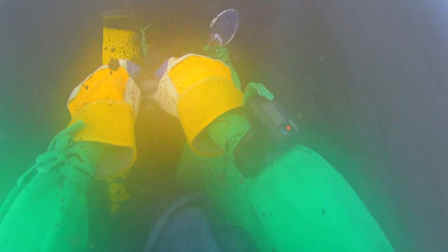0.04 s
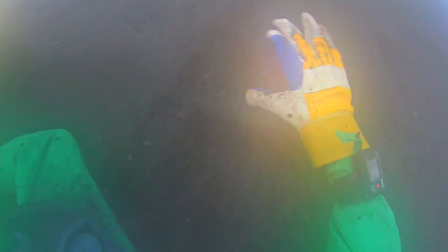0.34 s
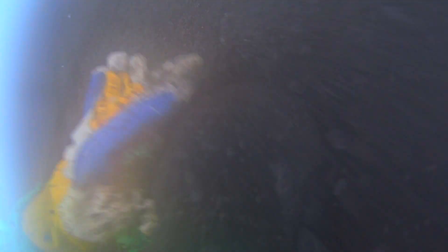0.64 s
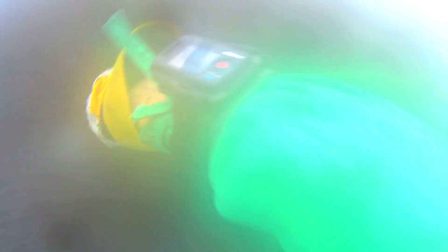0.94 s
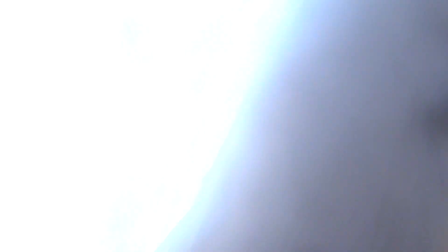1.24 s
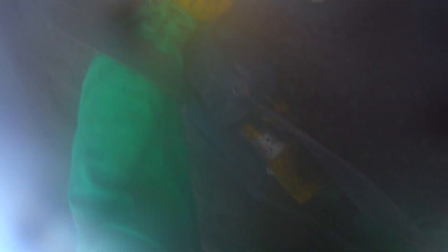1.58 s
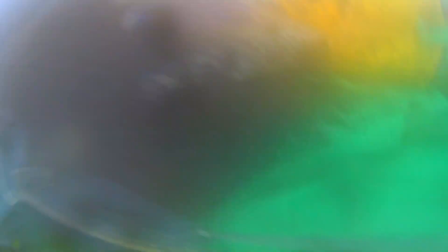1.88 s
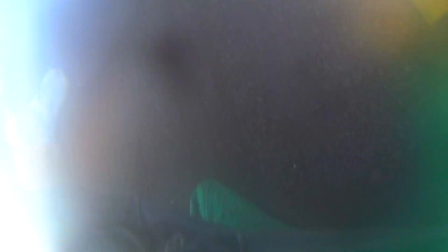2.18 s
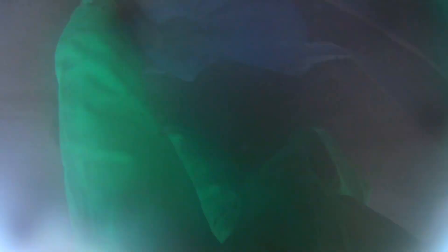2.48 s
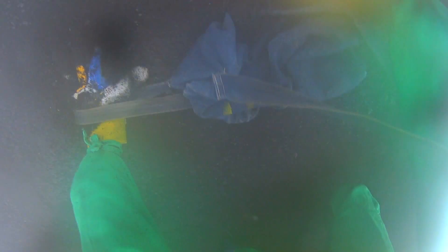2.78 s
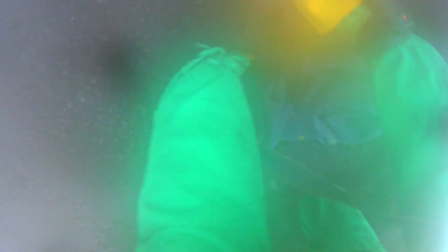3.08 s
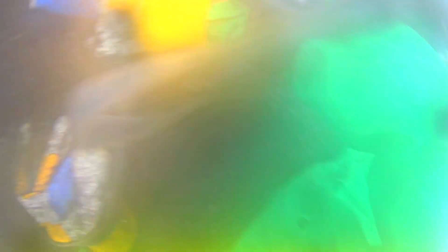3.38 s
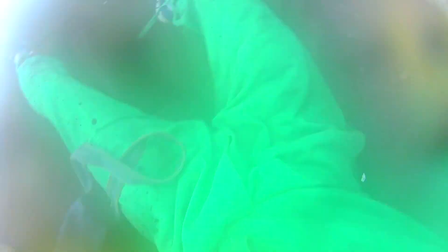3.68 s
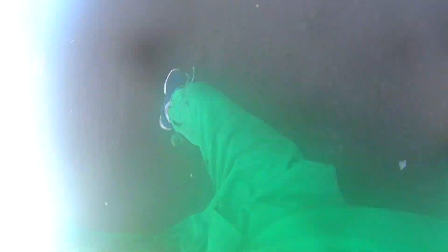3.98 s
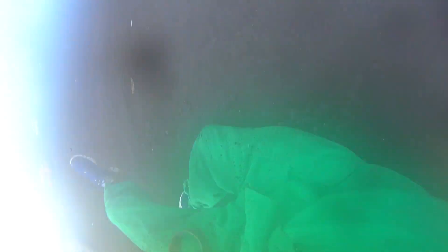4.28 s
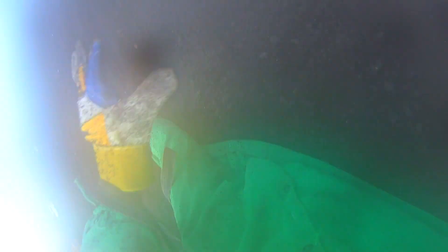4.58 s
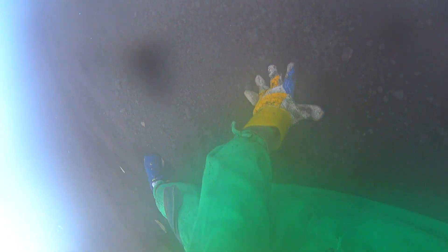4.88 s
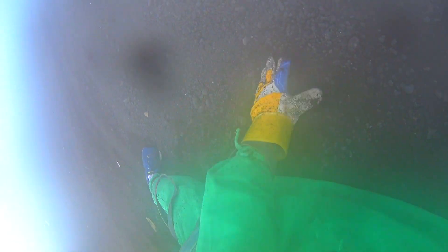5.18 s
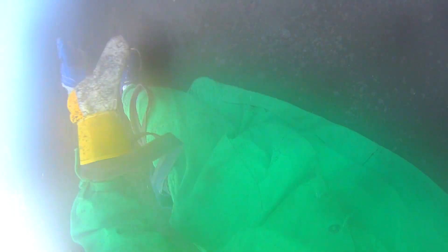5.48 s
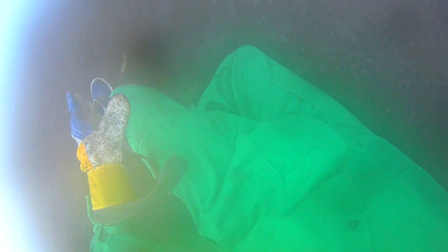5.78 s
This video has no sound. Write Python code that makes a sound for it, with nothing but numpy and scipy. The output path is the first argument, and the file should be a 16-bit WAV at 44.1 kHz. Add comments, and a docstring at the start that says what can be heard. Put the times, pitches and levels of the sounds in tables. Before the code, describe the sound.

Heard from a helmet microphone on an open slope, coarse gravel rattles and rumbles under a falling rider. A loud scrape and a spray of sand come early, followed by a run of hard plastic knocks, sharp ticks of stones and dull body thuds, with a faint metallic tone ringing on. In the second half the knocks thin out and the grinding fades, leaving short scrapes and a fine sandy hiss.

```python
"""A slope of volcanic gravel, heard from a helmet camera as its rider comes off a board and tumbles.
Gravel grinds on the helmet, the camera knocks in its plastic case and grit snaps against it;
all of this rings in the case. The body thumps on the ground, a few blows leave a thin metallic ring,
and fine sand hisses on as the slide dies away."""
import sys
import numpy as np
from scipy import signal
from scipy.fft import rfft, irfft
from scipy.io import wavfile
from scipy.ndimage import uniform_filter1d, minimum_filter1d

SR = 44100
rng = np.random.default_rng(int(sys.argv[2]) if len(sys.argv) > 2 else 0)


def int16_out(signal):
    """Quantize to a 16-bit WAV file."""
    q = np.round(np.clip(np.atleast_2d(signal).T, -1, 1) * 32767)
    wavfile.write(sys.argv[1], SR, q.astype(np.int16))


N = 257544
TIME = np.arange(N) / SR

# how hard the gravel grinds under the rider: time_s, level_db
GRIND_LEVEL = [(0, -27.5), (0.17, -36), (0.55, -29), (0.78, -21.5), (0.92, -31.5), (1.17, -29), (1.55, -37),
               (1.98, -30.5), (2.2, -38), (2.6, -39.5), (2.92, -43.5), (3.12, -37), (3.3, -42),
               (4.12, -39.5), (4.36, -61), (4.62, -44), (5.0, -47), (5.3, -58.5), (5.6, -52)]
# how much sand streams past the helmet: time_s, level_db
SAND_LEVEL = [(0, -47.5), (0.55, -44.5), (0.7, -30.5), (0.85, -31), (0.96, -46.5), (1.08, -34),
              (1.3, -57.5), (1.66, -43.5), (1.95, -42.5), (2.36, -55.5), (2.55, -45), (3.44, -38.5),
              (3.5, -57), (4.08, -44), (4.3, -47), (4.7, -40), (5.2, -47.5), (5.84, -54)]
# the helmet drags over the ground: start_s, end_s, level_db
DRAGS = [(0.452, 0.512, -28.5), (0.62, 0.733, -33), (0.746, 0.844, -16), (0.97, 1.002, -25.5),
         (1.03, 1.106, -29.5), (1.23, 1.238, -20.5), (1.411, 1.492, -29.5), (1.663, 1.738, -32),
         (1.958, 1.973, -20.5), (2.27, 2.288, -19.5), (2.489, 2.513, -25), (2.547, 2.606, -32.5),
         (2.688, 2.781, -37.5), (3.001, 3.038, -32.5), (3.075, 3.116, -37), (3.389, 3.414, -28.5),
         (3.461, 3.483, -22), (3.547, 3.56, -29.5), (3.678, 3.82, -38), (3.874, 3.898, -21),
         (3.939, 3.968, -19.5), (4.004, 4.055, -24), (4.083, 4.167, -31), (4.264, 4.284, -26.5),
         (4.486, 4.538, -30), (4.701, 4.714, -33.5), (5.063, 5.096, -27.5), (5.376, 5.417, -48.5),
         (5.823, 5.85, -37)]
# the rider hits the slope: start_s, level_db, pitch_hz
LANDINGS = [(0.448, -36.5, 199), (0.51, -34.5, 130), (0.57, -31, 294), (0.973, -34, 260),
            (1.03, -35.5, 117), (1.189, -26.5, 237), (1.269, -36.5, 245), (1.387, -27, 195.7),
            (1.575, -34, 203), (1.954, -27, 189), (2.278, -33, 261), (2.488, -33, 182), (2.786, -44.5, 185),
            (3.026, -27, 187), (3.384, -36.5, 183), (3.469, -28.5, 182), (3.87, -38, 209),
            (4.264, -44.5, 108), (4.534, -39.5, 260), (4.666, -44.5, 112), (4.986, -47, 207)]


def camera_knocks(bounce_s=0.0065, bounce_db=-7.5, rattles_per_s=7, bumps_per_s=9.2):
    """The camera clacks in its case, a short ring over a dull body; lighter hits ride the grinding."""
    # hard knocks, each followed by one bounce: start_s, ring_db, body_db
    hard_knocks = [(0.0167, -15.5, -42), (0.0935, -19, -46), (0.105, -13.5, -50), (0.1346, -17.5, -30.5),
                   (0.2092, -13, -39.5), (0.2613, -20.5, -40), (0.4463, -14, -30), (0.4661, -14, -46),
                   (0.4789, -11, -29), (0.6032, -14.5, -29.5), (0.6883, -15.5, -55), (0.9767, -12.5, -26),
                   (1.047, -15, -27.5), (1.189, -11.5, -27.5), (1.227, -12.5, -36), (1.3443, -19, -39),
                   (1.3878, -11.5, -20), (1.421, -11, -44), (1.5804, -23, -50), (1.5998, -14.5, -46),
                   (1.7199, -13, -29), (1.788, -18.5, -39.5), (1.9575, -12.5, -34), (1.9836, -15.5, -28.5),
                   (2.0175, -16, -34), (2.0755, -17.5, -59), (2.139, -23, -62), (2.1618, -28, -29),
                   (2.276, -9.5, -23), (2.314, -25.5, -29.5), (2.505, -17, -26.5), (2.8458, -23.5, -46),
                   (3.0018, -21.5, -49), (3.0284, -17, -25.5), (3.186, -19, -39.5), (3.474, -14.5, -27),
                   (3.5094, -12.5, -31), (3.8161, -22, -46), (4.011, -9.5, -50), (4.2719, -18, -38),
                   (5.013, -40, -44)]
    # colour of the ringing clack: freq_hz, gain_db
    clack_tone = [(400, -50), (800, -17), (1150, -2), (1500, 6.5), (2000, -1), (2700, -8), (3600, -16.5),
                  (4300, -11.5), (5000, -8), (8000, -55)]
    # colour of the dull body: freq_hz, gain_db
    body_tone = [(60, -22), (170, -0.5), (300, -2), (550, -2.5), (900, -3.5), (1600, -11.5), (5000, -46)]
    grind_db, = in_time(GRIND_LEVEL)
    hard = np.transpose(hard_knocks)
    bounces = [hard[0] + bounce_s * rng.uniform(0.496, 1.5, len(hard_knocks)), *(hard[1:] + bounce_db)]
    rattle_s, rattle_db = chance_hits(np.full(N, rattles_per_s), grind_db + 8.5)
    rattles = [rattle_s, rattle_db, rattle_db - 22]   # the camera rattles: nearly all ring
    bump_s, bump_db = chance_hits(np.full(N, bumps_per_s), grind_db - 6.5)
    bumps = [bump_s, bump_db - 2, bump_db]   # stones roll under the helmet: soft and hollow
    start_s, ring_db, body_db = np.hstack([hard, bounces, rattles, bumps])
    clack = blows(start_s, ring_db - 1.5, clack_tone, chatter_s=0.0042, chatter=0.88)
    thud = blows(start_s, body_db + 4, body_tone, chatter_s=0.0027, chatter=0.27)
    return through_shell(clack + thud)


def helmet_scrapes(rise_s=0.0057, fall_s=0.0052, slip_db=2.5, trim_db=3, margin=2500):
    """While the helmet drags, stones catch and slip under it in quick uneven bursts."""
    # colour of the rasp: freq_hz, gain_db
    rasp_tone = [(130, -19), (300, -15), (560, -13.5), (750, -3.5), (1000, -3), (1450, 2.5), (2000, -3.5),
                 (2450, -7.5), (3000, -16.5), (3600, -12.5), (4250, -14.5), (4700, -21), (6500, -46)]
    pressure = np.zeros(N)
    for start, end, db in DRAGS:
        near = slice(max(int(start * SR) - margin, 0), int(end * SR) + margin)
        fade = np.maximum(start - TIME[near], 0) / rise_s + np.maximum(TIME[near] - end, 0) / fall_s
        pressure[near] = np.maximum(pressure[near], from_db(db) * np.exp(-fade))
    force = grains(per_s=1300, spread_db=1.5, friction=0.69) * from_db(slip_db * drift(per_s=200))
    rasp = through_shell(through_case(force, rasp_tone))
    power = uniform_filter1d(np.mean(rasp ** 2, axis=0), size=900)
    return from_db(trim_db) * pressure * rasp / np.sqrt(np.abs(power) + 1e-9)


def gravel_slide(crunch_db=2.5, shudder_db=5.1, surge_above_db=-37.5):
    """Gravel rolls under the rider and sprays past; the coarser it is, the more it comes in clumps."""
    # coarseness of the gravel, as the spread of grain sizes: time_s, spread_db
    coarseness = [(0, 6), (.75, 3.5), (1.0, 3.5), (2.3, 7), (2.7, 0.53), (4.8, 0.93), (5.8, 2)]
    # midrange crunch of rolling gravel: freq_hz, gain_db
    grind_tone = [(300, -33), (560, -31), (750, -6.5), (1100, -9.5), (1450, 2), (1950, -4.5), (2600, -9),
                  (3200, -15), (4200, -11), (4900, -20), (6500, -31)]
    # low rumble of the slide: freq_hz, gain_db
    rumble_tone = [(20, -17), (55, -3), (115, 3), (148, -6), (190, 0), (330, -7), (600, -4.5), (1200, -7.5)]
    # bright coarse spray: freq_hz, gain_db
    spray_tone = [(2000, -31), (3600, -12), (5000, 3.5), (6800, 3.5), (7800, 5.5), (9800, 3), (12000, -17),
                  (16000, 9.5)]
    # airy hiss of fine sand: freq_hz, gain_db
    sand_tone = [(7000, -23), (9800, -10), (11200, -1), (12300, -1.5), (13100, -0.5), (14500, 1.5),
                 (15800, -2), (17000, -4)]
    grind_db, = in_time(GRIND_LEVEL)
    sand_db, = in_time(SAND_LEVEL)
    spread_db, = in_time(coarseness)
    # a strong stream of sand carries coarse spray as well
    spray_db = sand_db - 6.5 + np.maximum(sand_db - surge_above_db, 0)
    clumps_db = 0.53 * spread_db * drift(per_s=140)
    showers_db = 0.97 * spread_db * drift(per_s=27)
    rolling = grains(per_s=1100, spread_db=spread_db, friction=1)
    rolling *= from_db(grind_db - 1.44 + 0.58 * clumps_db + crunch_db * drift(per_s=20))
    rumble = rng.standard_normal((2, N)) * rumble_gain(grind_db) * from_db(shudder_db * drift(per_s=32))
    spray = grains(per_s=3100, spread_db=spread_db, friction=1)
    spray *= from_db(spray_db + showers_db + 2.6 * clumps_db)
    sand = grains(per_s=10000, spread_db=spread_db, friction=0.16)
    sand *= from_db(sand_db + 2 + showers_db + 1.34 * clumps_db)
    return (through_case(rolling, grind_tone) + through_case(rumble, rumble_tone)
            + through_case(spray, spray_tone) + through_case(sand, sand_tone))


def grit_snaps(usual_sand_db=-44, usual_ticks_per_s=14, tick_db=-31.5, tumble_end_s=2.5):
    """Hard stones snap brightly on the case; the tumble throws up lighter ticks with the sand."""
    # the larger stones strike: start_s, level_db
    strikes = [(0.0044, -20), (0.1183, -23.5), (0.1355, -22), (0.261, -23.5), (0.2886, -27.5),
               (0.387, -23.5), (0.412, -22.5), (0.589, -28), (0.712, -20), (0.7397, -13), (0.9002, -23),
               (0.9678, -24), (1.014, -25), (1.0974, -24), (1.336, -24), (1.597, -24), (1.6773, -25.5),
               (1.775, -19.5), (1.789, -24), (1.844, -25.5), (1.88, -23), (1.937, -23), (2.021, -25),
               (2.0844, -21.5), (2.1383, -22.5), (2.1613, -22), (2.315, -28), (2.424, -31), (2.5056, -25.5),
               (3.4705, -32)]
    # colour of a snap: freq_hz, gain_db
    snap_tone = [(1000, 5), (2500, 8.5), (4000, 8), (5500, 3.5), (6600, -2.5), (7700, 0), (9800, -8.5),
                 (11500, 0.5), (13300, 6.5), (16000, -4)]
    sand_db, = in_time(SAND_LEVEL)
    swell_db = 0.54 * (sand_db - usual_sand_db)   # more sand: denser, louder ticks
    ticks_per_s = usual_ticks_per_s * from_db(swell_db) * (TIME < tumble_end_s)
    ticks = chance_hits(ticks_per_s, tick_db + swell_db)
    start_s, level_db = np.hstack([np.transpose(strikes), ticks])
    return blows(start_s, level_db + 1.5, snap_tone, chatter_s=0.002, chatter=1.28, stone_ring=0.57)


def body_thumps(shake_db=-2, boom_db=5):
    """The body's weight comes down: the helmet shakes and booms for a few cycles."""
    # bass-heavy colour of the shake: freq_hz, gain_db
    shake_tone = [(20, -10.5), (50, -4.5), (80, -3), (115, 2), (148, -2.5), (185, -1), (300, -5),
                  (450, -19), (900, -11.5), (3000, -75)]
    start_s, level_db, _ = np.transpose(LANDINGS)
    shake = blows(start_s, level_db + shake_db, shake_tone, chatter_s=0.016, chatter=0.83, span_s=0.03)
    boom = sum(dying_sine(s, hz, db + boom_db, t60_s=0.13, rise_s=0.005) for s, db, hz in LANDINGS)
    return shake + boom


def metallic_rings():
    """A few hard blows leave a thin metallic tone."""
    # the ringing tones: start_s, pitch_hz, level_db, t60_s
    tones = [(0.287, 7480, -15, 0.02), (0.834, 1452, -27.5, 1.8), (2.281, 1455, -39, 4.3),
             (3.512, 3300, -46.5, 0.71)]
    return sum(dying_sine(s, hz, db, t60_s, rise_s=0.00065) for s, hz, db, t60_s in tones)


def rumble_gain(grind_db, drag_db=-22.5, plough_db=-15.5, fall_db_per_s=123):
    """The low rumble follows the grinding, rises while the helmet drags and swells at every landing."""
    power = from_db(0.55 * grind_db - 34) ** 2
    for start, end, db in DRAGS:
        power[int(start * SR):int(end * SR)] += from_db(db + drag_db) ** 2
    for start, db, _ in LANDINGS:
        after = slice(int(start * SR), int((start + 1) * SR))
        power[after] += from_db(db + plough_db - fall_db_per_s * (TIME[after] - start)) ** 2
    return np.sqrt(power)


def blows(times_s, levels_db, tone, chatter_s, chatter, stone_ring=0, span_s=0.005, size=6000):
    """Each blow on the case is a push, a dying chatter and an optional ring; level is taken over span_s."""
    force, age = np.zeros((2, N + size)), np.arange(size) / SR
    colour = rms_one(from_db(at_hz(tone, np.arange(size // 2 + 1) * SR / size)))
    for s, db in zip(times_s, levels_db):
        stone = stone_ring * np.sin(2 * np.pi * rng.uniform(2740, 15040) * age)
        blow = chatter * rms_one((rng.standard_normal((2, size)) + stone) * np.exp(-age / chatter_s))
        blow[:, 0] += np.sqrt(size) * rng.choice([-1, 1], 2)   # the push
        energy = np.mean(abs(rfft(blow) * colour) ** 2, axis=1, keepdims=True)
        start = max(round(s * SR), 0)
        force[:, start:start + size] += from_db(db) * blow * np.sqrt(span_s * SR / energy)
    return through_case(force[:, :N], tone)


def grains(per_s, spread_db, friction):
    """Stones touch at random, few hard and many soft, over smooth friction noise; steady unit power."""
    sizes = from_db(spread_db * np.minimum(rng.exponential(1, N), 4))
    contacts = (rng.random(N) < per_s / SR) * sizes * rng.standard_normal((2, N))
    power = uniform_filter1d(np.mean(contacts ** 2, axis=0), size=1300)
    return rms_one(contacts / np.sqrt(np.abs(power) + 1e-6) + friction * rng.standard_normal((2, N)))


def through_case(force, tone, size=4096, skirt_db_per_octave=22):
    """A (push, rock) force takes on a colour and the case's resonances, and comes out in stereo."""
    # narrow resonances of the case: freq_hz, width_hz, gain_db
    case_modes = [(1309, 124, 3.0), (1484, 28, 3.5), (1700, 25, -1.5), (1876, 18, 3.5), (2029, 170, 4.5),
                  (3560, 89, 6)]
    # how much the case rocks rather than pushes its two microphones: freq_hz, side_minus_mid_db
    rocking = [(60, -13), (140, -13.5), (270, -9.5), (520, -2), (850, -0.5), (1200, -4), (1500, -9.5),
               (2000, -4.5), (2600, 2), (3600, -5.5), (4500, 0.5), (6000, -7), (8300, -2.5), (13000, -6)]
    # stereo balance: freq_hz, left_minus_right_db
    balance = [(100, -1.1), (250, 0.1), (500, 3), (1200, 2), (2500, 0.5), (8000, -0.5), (14000, -1)]
    hz = np.arange(size // 2 + 1) * SR / size
    octaves_outside = abs(np.log2(np.maximum(hz, 1) / np.clip(hz, tone[0][0], tone[-1][0])))
    db = at_hz(tone, hz) - skirt_db_per_octave * octaves_outside
    db += sum(boost / (1 + (2 * (hz - centre) / width) ** 2) for centre, width, boost in case_modes)
    rock = from_db(at_hz(rocking, hz))
    lean_db = at_hz(balance, hz) / 2
    gain = rms_one(from_db(db)) / np.sqrt(1 + rock ** 2)
    channels = []
    for sign in (1, -1):
        responses = np.array([causal_response(gain * from_db(sign * lean_db) * g) for g in (1, rock)])
        pushed, rocked = signal.oaconvolve(force, responses, axes=1)[:, :N]
        channels.append(pushed + sign * rocked)
    return np.array(channels)


def through_shell(x, bend_hz=1600, bend_width_hz=900, cutoff_hz=4124):
    """The plastic shell dulls the treble, and bending waves smear each hit into a short wave packet."""
    radius = np.exp(-np.pi * bend_width_hz / SR)
    poles = [1, -2 * radius * np.cos(2 * np.pi * bend_hz / SR), radius ** 2]
    smeared = signal.lfilter(poles[::-1], poles, x + 1e-18)   # all-pass
    return signal.sosfilt(signal.butter(8, cutoff_hz, fs=SR, output="sos"), smeared)


def dying_sine(start_s, hz, db, t60_s, rise_s):
    """A struck resonance swells quickly and rings out."""
    out = np.zeros(N)
    start = max(round(start_s * SR), 0)
    age = TIME[:min(int(t60_s * SR), N - start)]
    envelope = from_db(db - 60 * age / t60_s) * (1 - np.exp(-age / rise_s))
    out[start:start + len(age)] = envelope * np.sin(2 * np.pi * hz * age)
    return out


def chance_hits(per_s, level_db, spread_db=1.5, candidates=240):
    """Times and levels of random hits, whose rate and mean level follow two curves."""
    when, luck, strength = rng.random((candidates, 3)).T
    at = (when * N).astype(int)
    kept = luck < per_s[at] * (N / SR) / candidates
    hit_db = level_db[at] + spread_db * np.sqrt(12) * (strength - 0.5)
    return TIME[at][kept], hit_db[kept]


def drift(per_s):
    """A random wander of unit rms that turns per_s times a second."""
    knots = np.random.default_rng(rng.integers(1 << 30)).standard_normal(int(N / SR * per_s) + 2)
    return rms_one(np.interp(TIME * per_s, np.arange(len(knots)), knots))


def causal_response(gain):
    """The minimum-phase impulse response with this gain per frequency."""
    cepstrum = irfft(np.log(gain + 1e-9))
    half = len(cepstrum) // 2
    folded = np.r_[cepstrum[0], 2 * cepstrum[1:half], np.zeros(half)]
    return irfft(np.exp(rfft(folded)))


def in_time(rows):
    """One automation curve for each column after the time, straight between the rows."""
    time_s, *columns = np.transpose(rows)
    return [np.interp(TIME, time_s, column) for column in columns]


def at_hz(points, hz):
    """Read a table on a log-frequency axis."""
    freq_hz, value = np.transpose(points)
    return np.interp(np.log(np.maximum(hz, 1)), np.log(freq_hz), value)


def from_db(db):
    """Decibels to gain."""
    return 10 ** (np.asarray(db) / 20)


def rms_one(x):
    """Scale to unit rms."""
    return x / np.sqrt(np.mean(x ** 2) + 1e-20)


def scene():
    """Everything sounds close to the helmet; the open slope gives no echo."""
    return (gravel_slide() + helmet_scrapes() + camera_knocks()
            + grit_snaps() + body_thumps() + metallic_rings())


def record(dry, ceiling=0.91, window=130, cutoff_hz=15900):
    """A fast limiter ducks both sides around the hardest peaks; a steep low-pass cuts the top."""
    needed = 1 / np.maximum(np.abs(dry).max(axis=0) / ceiling, 1)
    gain = uniform_filter1d(minimum_filter1d(needed, window), window)
    low_pass = signal.ellip(12, 0.1, 80, cutoff_hz, fs=SR, output="sos")
    return signal.sosfilt(low_pass, gain * dry)


dry = scene()
out = record(dry)
int16_out(out)
```